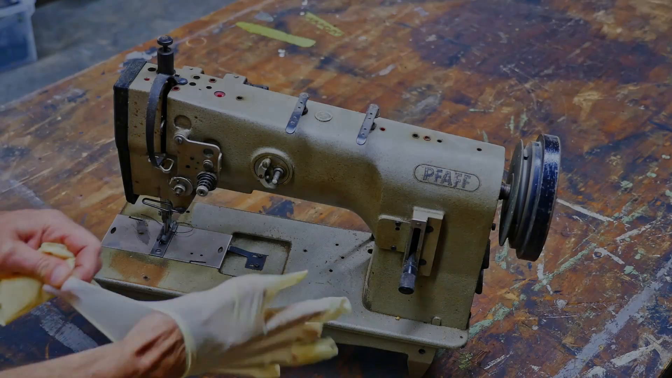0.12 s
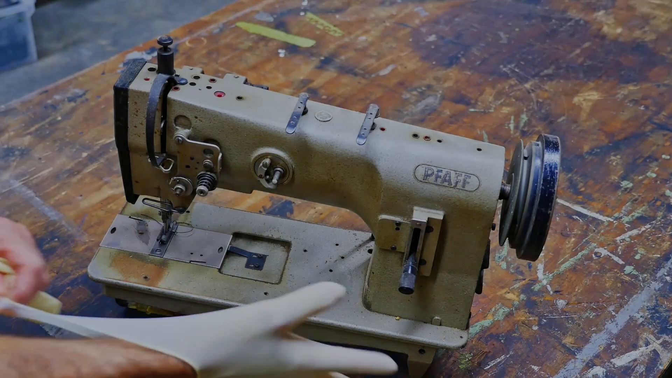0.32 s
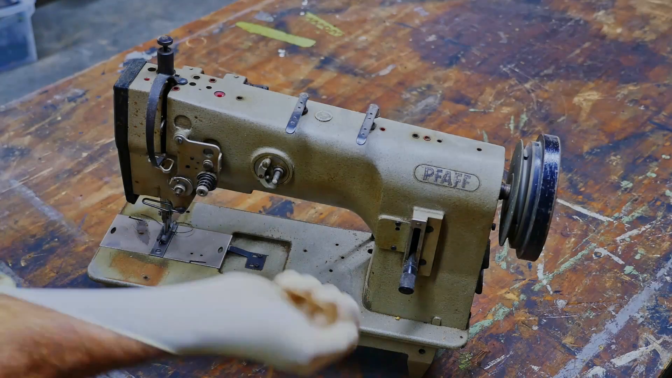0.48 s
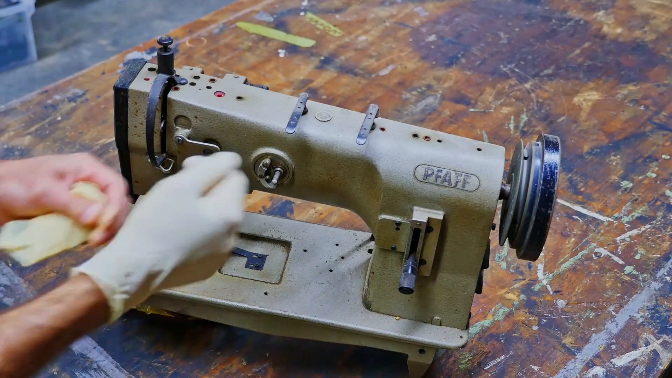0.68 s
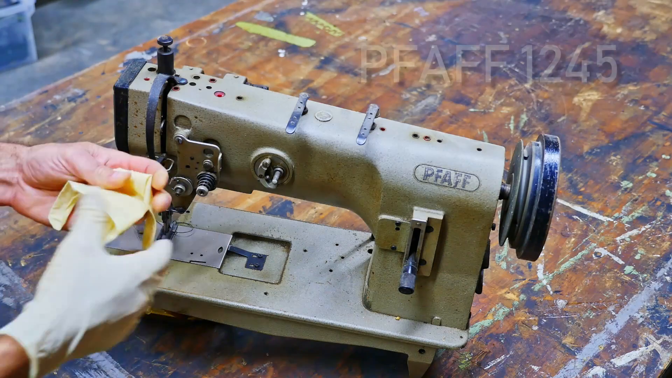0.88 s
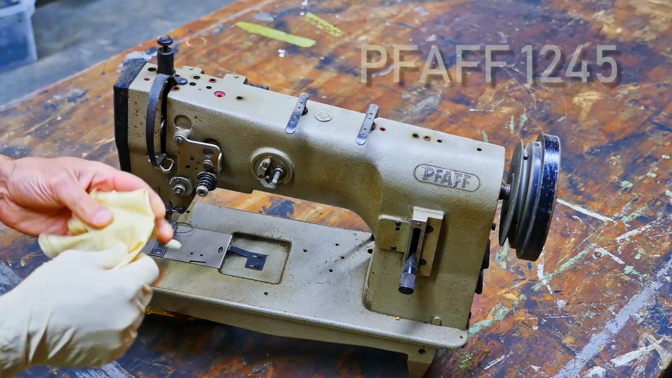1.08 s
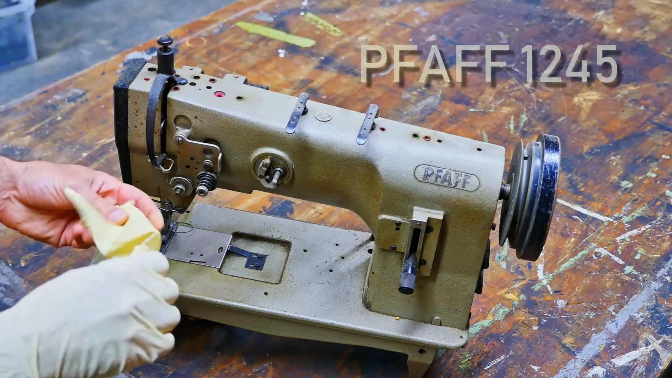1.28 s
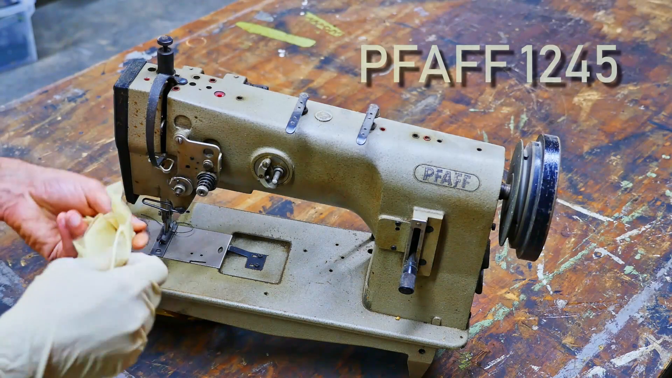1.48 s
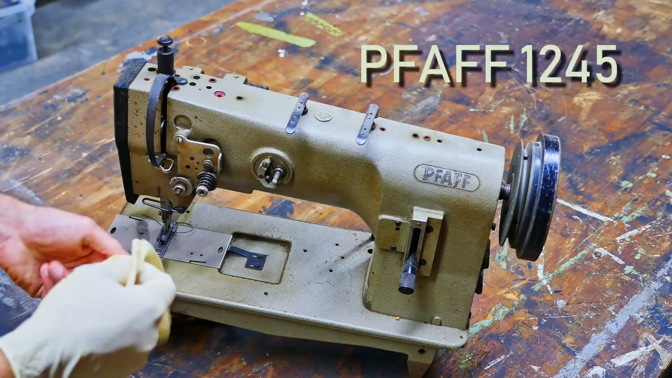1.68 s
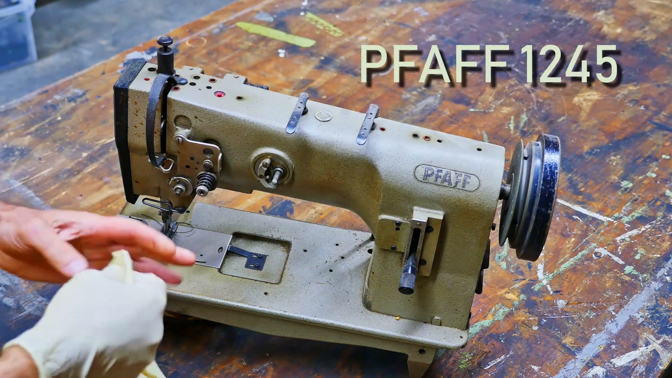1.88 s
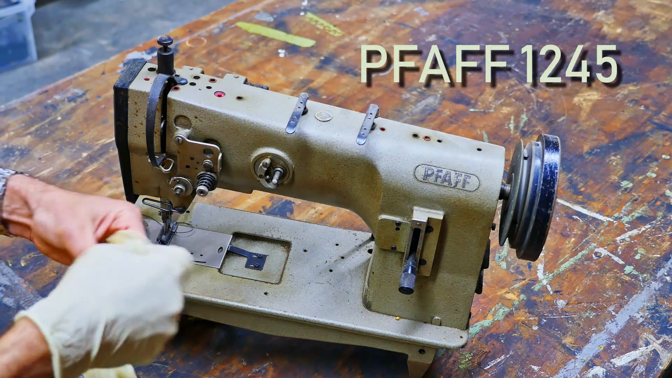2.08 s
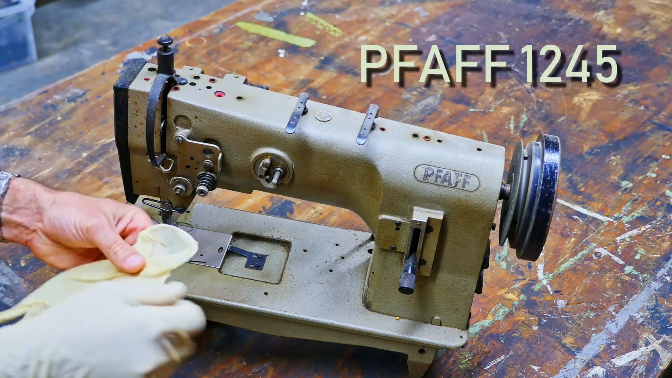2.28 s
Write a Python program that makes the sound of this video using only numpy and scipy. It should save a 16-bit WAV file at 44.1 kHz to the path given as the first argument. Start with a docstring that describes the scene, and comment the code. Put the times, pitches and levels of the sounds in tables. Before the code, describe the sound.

A rubber glove is pulled on, close and central: rubbing with dull fold pops and soft air puffs from 0 to 0.27 s, a tiny rising squeak at 0.3, stuttering cuff judder at 0.38-0.48, then bright snaps at 0.62 and 0.73. Afterwards a second glove rustles softly, with small pops near 1.25, 1.68 and 2.12 s, fading over faint hum in a small, lightly reverberant workshop.

```python
"""Rubber gloves in a quiet workshop

A rubber glove is pulled onto a hand above a bench: folds pop, the cuff squeaks, judders and snaps.
Then a second glove is rustled between the fingers over a faint electrical hum.
Filtered random grains make the friction, filtered clicks and noise bursts the events,
and a sum of harmonics the squeak; a diffuse room tail and a small microphone complete it."""
import sys
import numpy as np
from scipy import signal
from scipy.fft import rfft, irfft
from scipy.io import wavfile

SR = 44100
rng = np.random.default_rng(int(sys.argv[2]) if len(sys.argv) > 2 else 0)


def inscribe(sig):
    """Save sig as 16-bit PCM at rate SR to the path in sys.argv[1].

    A 1-D sig is mono; a 2-D sig holds one channel per row.
    Samples are clipped to [-1, 1] before scaling.
    """
    pcm = np.round(np.clip(np.atleast_2d(sig).T, -1, 1) * 32767)
    wavfile.write(sys.argv[1], SR, pcm.astype(np.int16))


N = 101430
T = np.arange(N) / SR

# hum tones: f/Hz, level/dB
HUM_TONES = [(120, -71), (240.5, -66.5), (296.8, -62.5), (595, -75)]
# room noise spectrum: f/Hz, density/dB per Hz
AIR_SPECTRUM = [(25, -108), (45, -101), (62, -93), (120, -89), (215, -84), (360, -85.5), (500, -89.5),
                (1000, -94), (2000, -96.5), (3600, -100), (5500, -104), (9000, -103), (14000, -103)]
# diffuse sound, side against mid: f/Hz, gain/dB
DIFFUSE_WIDTH = [(60, 0.5), (600, 1.5), (1100, 1), (2400, -4.5), (4000, -4.5), (5500, -10), (7500, -6.5),
                 (10000, -5.5), (13000, 5)]
# near sound, stereo spread: f/Hz, side gain/dB
DIRECT_WIDTH = [(100, -16), (1000, -18.5), (3500, -12), (5500, -17.5), (7500, -9), (10000, -1), (13000, -3)]
# left minus right: f/Hz, difference/dB
BALANCE = [(100, -0.7), (500, -1), (1500, 1.8), (5000, 0), (8000, -0.3), (13000, -3.5)]
# microphone response: f/Hz, gain/dB
MICROPHONE = [(30, -3.5), (4300, 2), (4900, 4.5), (5500, 7), (6400, 1), (7400, 2), (8200, -3.5),
              (10000, -5), (11500, -13), (15000, -22.5)]
# rubber rubbing on rubber and skin: t/s, level/dB
RUB_LEVEL = [(0, -44.5), (0.2, -43.5), (0.262, -34.5), (0.3, -39.5), (0.37, -38.5), (0.48, -40.5),
             (0.565, -35.5), (0.6, -44.5), (0.68, -38), (0.78, -48), (0.9, -53.5), (0.93, -49.5),
             (0.985, -55.5), (1.03, -46), (1.082, -42.5), (1.11, -48), (1.2, -47), (1.28, -48.5),
             (1.365, -45.5), (1.45, -51), (1.53, -48.5), (1.65, -54), (1.73, -51.5), (1.81, -64),
             (1.95, -58.5), (2.04, -60), (2.085, -52.5), (2.14, -46.5), (2.19, -54.5), (2.3, -60.5)]
# friction hiss filter: f/Hz, gain/dB
RUB_COLOUR = [(40, -17), (140, 5), (350, -4.5), (900, -6.5), (2200, -1.5), (3700, -6), (5400, 2), (7200, 1),
              (10000, 0), (14000, -5)]
# lower rustle of the stretched sheet: f/Hz, gain/dB
PULL_COLOUR = [(40, -31), (130, -4), (240, 6), (650, 2), (1400, -2.5), (2300, 1.5), (4000, -5.5),
               (12000, -20)]
# trapped air leaving the glove: t/s, level/dB, decay/s, f/Hz
PUFFS = [(0.059, -38, 0.0035, 380), (0.114, -40, 0.02, 260), (0.217, -34.5, 0.022, 292),
         (0.551, -41.5, 0.0061, 402), (0.622, -45, .018, 174), (0.7111, -32, 0.0021, 330),
         (0.7201, -31.5, 0.0036, 297)]
# folds popping over: t/s, level/dB, decay/s, centre f/Hz, width/octaves
FOLDS = [(0.0233, -21.5, 0.01, 1150, 1.5), (0.097, -29, 0.0031, 1190, 2.4),
         (0.1134, -23, 0.0068, 1430, 1.43), (0.1285, -21, 0.0042, 1550, 1.26),
         (0.2605, -23.5, 0.0097, 1720, 1.7), (0.2680, -20, 0.0044, 2200, 0.94),
         (0.551, -24.5, .012, 674, 2.1), (0.6234, -14.5, 0.0051, 2080, 0.54),
         (0.687, -20.5, 0.012, 1710, 0.43), (1.2095, -37, .003, 2200, .6),
         (1.2240, -34.5, 0.0059, 2180, 0.54), (1.243, -39, 0.0043, 2200, .7),
         (1.2714, -30.5, 0.005, 1840, 0.55), (1.6764, -27.5, 0.0054, 2150, 0.63),
         (2.1105, -38.5, 0.022, 1580, 1.9)]
# cuff squeak: t/s, f/Hz, level/dB
SQUEAK = [(0.294, 1504, -73), (0.303, 1539, -49), (0.311, 1580, -51), (0.32, 1586, -30.5),
          (0.326, 1568, -29), (0.330, 1680, -35), (0.337, 1890, -37), (0.345, 2030, -60)]
# squeak harmonics 1-5 at full strength: level/dB
SQUEAK_HARMONICS = [-12, -2, -13, -3.5, -17]
# taut rubber slapping skin: t/s, level/dB, rise/s, decay/s, lower f/Hz, upper f/Hz, relative ring/dB
SNAPS = [(0.2164, -29, 0.00029, 0.015, 380, 14000, -21), (0.3591, -23.5, 0.0018, 0.0041, 1200, 6500, -34),
         (0.6206, -20.5, 0.00035, 0.005, 158, 13300, -30),
         (0.627, -18.5, 0.00044, 0.0096, 3580, 12100, 0.5), (0.723, -28.5, 0.0044, 0.018, 1610, 9200, -24),
         (0.7307, -15.5, 0.00034, 0.0016, 2280, 5650, -28), (1.4105, -45, .001, .008, 3500, 8000, -12),
         (2.1323, -42.5, 0.0017, 0.018, 1480, 7500, 2)]
# reflections off the bench: delay/s, gain/1
BENCH_ECHOES = [(.0031, 0.5)]
# cuff sticking and slipping on skin: t/s, release/dB, rasp/dB, release f/Hz, rasp upper f/Hz
SLIPS = [(0.3833, 7, -32, 5000, 8000), (0.3898, -5, -27, 5500, 10000), (0.4024, 7, -23, 5300, 11000),
         (0.4112, -5, -26, 5800, 11000), (0.4185, 8, -22, 5400, 11000), (0.4295, -1, -22, 5400, 10000),
         (0.4410, -3, -26, 5000, 8000), (0.4553, 5, -26, 2200, 9000), (0.4698, 4, -25, 2200, 9000)]
# slip filter: f/Hz, gain/dB
SLIP_COLOUR = [(40, -16.5), (140, -41), (300, 1), (600, -7.5), (1200, 2), (2300, 1.5), (3600, -1.5),
               (5200, 2), (9000, 1), (14000, -16)]
# reflections off the metal bed and the bench: delay/s, gain/1
SLIP_ECHOES = [(.00155, 0.79), (.0032, .8)]

ROOM_DB, ROOM_ONSET_S, ROOM_SPLIT_HZ = -10.5, 0.0031, 5600
ROOM_T60_S, ROOM_TREBLE_T60_S = 0.48, 0.3
SPREAD_RISE_S, SPREAD_DECAY_S = 0.00011, 0.001
CUTOFF_HZ = 15500
GRAINS_PER_S, GRAIN_SPREAD_DB, RUB_FLUTTER_DB = 5400, 1, 1.1
TICKS_PER_S, TICK_DB, TICK_SPREAD_DB = 120, 13, 2
PULL_END_S, PULL_RELEASE_S, PULL_DB = 0.66, 0.14, -39.5
PUFF_RISE_S, PUFF_OCTAVES = 0.0015, 0.69
FOLD_RISE_S = 0.0012
SQUEAK_THINS_DB, SQUEAK_RELEASE_S = 12, 0.008
SQUEAK_TILT_DB_PER_DB, SQUEAK_JITTER = 0.23, 0.0077  # tilt per harmonic; jitter as a fraction of pitch
SNAP_RING_HZ, SNAP_RING_DECAY_S, SNAP_RING_WANDER_RAD = 5530, 0.0025, 0.2
RASP_RISE_S, RASP_DECAY_S = 0.0035, 0.016
RELEASE_OCTAVES, RELEASE_CLICK_DB = 0.26, -8


def from_db(db):
    """Decibels to amplitude gain."""
    return 10 ** (np.asarray(db) / 20)


def convolve(x, response):
    """Filter by an impulse response."""
    return signal.fftconvolve(x, response)[:N]


def colour(x, points):
    """Minimum-phase filter through (f/Hz, gain/dB) points, by folding the cepstrum."""
    hz, db = np.transpose(points)
    size = 8192
    grid_hz = np.maximum(np.arange(size // 2 + 1) * SR / size, 1)
    gain = from_db(np.interp(np.log(grid_hz), np.log(hz), db))
    cepstrum = irfft(np.log(gain))
    cepstrum[1:size // 2] *= 2
    cepstrum[size // 2 + 1:] = 0
    return convolve(x, irfft(np.exp(rfft(cepstrum))))


def band(x, low_hz, high_hz):
    """Butterworth band-pass."""
    sos = signal.butter(2, [low_hz, high_hz], "band", fs=SR, output="sos")
    return signal.sosfilt(sos, x + 1e-18)  # offset avoids denormals


def around(x, hz, octaves):
    """Band-pass about a centre."""
    half = 2 ** (octaves / 2)
    return band(x, hz / half, hz * half)


def drift(points_per_s):
    """Random wander: straight lines between normal random points."""
    return np.interp(T * points_per_s, np.arange(N), rng.standard_normal(N))


def envelope(start_s, rise_s, decay_s):
    """Straight rise, exponential fall."""
    rise = np.clip((T - start_s) / rise_s, 0, 1)
    return rise * np.exp(-np.maximum(T - start_s - rise_s, 0) / decay_s)


def burst(start_s, rise_s, decay_s):
    """Random-sign noise under an envelope: a dying shower of tiny contacts."""
    return envelope(start_s, rise_s, decay_s) * rng.choice([-1., 1.], N)


def echoes(x, rows):
    """Adds delayed copies: reflections from close surfaces."""
    return x + sum(gain * np.interp(T - delay_s, T, x, left=0) for delay_s, gain in rows)


def background():
    """Room noise plus hum tones of slightly wavering phase."""
    hum = np.zeros(N)
    for hz, db in HUM_TONES:
        phase = 2 * np.pi * (hz * T + rng.random()) + 0.2 * drift(6)
        hum += from_db(db) * np.sqrt(2) * np.sin(phase)
    air = rng.standard_normal(N) * np.sqrt(SR / 2)  # unit power per Hz
    return hum + colour(air, AIR_SPECTRUM)


def room(x):
    """Diffuse tail of decaying noise; its treble dies sooner."""
    decay_s = ROOM_T60_S / np.log(1000)
    treble_decay_s = ROOM_TREBLE_T60_S / np.log(1000)
    low = band(rng.standard_normal(N), 60, ROOM_SPLIT_HZ)
    treble = band(rng.standard_normal(N), ROOM_SPLIT_HZ, CUTOFF_HZ)
    tail = low * envelope(0.005, ROOM_ONSET_S, decay_s)
    tail += treble * envelope(0.003, ROOM_ONSET_S, treble_decay_s)
    return from_db(ROOM_DB) * convolve(x, tail) / np.sqrt(SR * decay_s / 2)


def grains():
    """Dense tiny catches of random sign and uneven size, rms 1."""
    hits = (rng.random(N) < GRAINS_PER_S / SR) * rng.choice([-1, 1], N)
    x = hits * from_db(GRAIN_SPREAD_DB * np.minimum(rng.exponential(1, N), 5))
    return x / (x.std() + 1e-12)


def ticks():
    """Sparse, larger catches of rubber on rubber, echoed by the bench."""
    size_db = TICK_DB + TICK_SPREAD_DB * np.clip(rng.standard_normal(N), -2, 2)
    hits = (rng.random(N) < TICKS_PER_S / SR) * from_db(size_db)
    return echoes(band(hits, 510, 6200), BENCH_ECHOES)


def rubbing():
    """Fluttering friction hiss, with a lower rustle while the sheet is under tension."""
    hiss_db = np.interp(T, *np.transpose(RUB_LEVEL)) + RUB_FLUTTER_DB * drift(70)
    hiss = (grains() + ticks()) * from_db(hiss_db)
    tension = np.exp(-np.maximum(T - PULL_END_S, 0) / PULL_RELEASE_S)
    pull = grains() * from_db(PULL_DB + RUB_FLUTTER_DB * drift(48.6)) * tension
    return colour(hiss, RUB_COLOUR) + colour(pull, PULL_COLOUR)


def puffs():
    """Trapped air escapes: low, heavily damped thuds of flattened narrow-band noise."""
    out = np.zeros(N)
    for start_s, db, decay_s, hz in PUFFS:
        air = signal.hilbert(around(rng.standard_normal(N), hz, PUFF_OCTAVES))
        steady = np.cos(np.angle(air))  # phase only, constant amplitude
        thud = around(steady * envelope(start_s, PUFF_RISE_S, decay_s), hz, 2.4)
        out += from_db(db) * thud * np.sqrt(2)
    return out


def folds():
    """Folds pop over: dull noise bursts, each in its own band."""
    out = np.zeros(N)
    for start_s, db, decay_s, hz, octaves in FOLDS:
        out += from_db(db) * around(burst(start_s, FOLD_RISE_S, decay_s), hz, octaves)
    return out


def squeak():
    """Regular stick-slip: a rising tone, brighter as it swells; overtones fade as the grip lets go."""
    t_s, hz, db = np.transpose(SQUEAK)
    level_db, pitch_hz = np.interp(T, t_s, db), np.interp(T, t_s, hz)
    phase = 2 * np.pi * np.cumsum(pitch_hz * (1 + SQUEAK_JITTER * drift(600))) / SR
    thinning_db = -SQUEAK_THINS_DB * np.clip((T - t_s[db.argmax()]) / SQUEAK_RELEASE_S, 0, 1)
    below_peak_db = level_db - db.max()
    tone = np.zeros(N)
    for k, harmonic_db in enumerate(SQUEAK_HARMONICS):
        tilt_db = SQUEAK_TILT_DB_PER_DB * (k - 3) * below_peak_db
        part_db = level_db + harmonic_db + tilt_db + (k > 0) * thinning_db
        tone += from_db(part_db) * np.sin((k + 1) * phase)
    return np.sqrt(2) * tone * (T > t_s[0]) * (T < t_s[-1])


def snaps():
    """Taut rubber slaps skin: a broad crack with bench echo and a brief bright ring of the sheet."""
    out = np.zeros(N)
    for start_s, db, rise_s, decay_s, low_hz, high_hz, ring_db in SNAPS:
        phase = 2 * np.pi * SNAP_RING_HZ * (T - start_s) + SNAP_RING_WANDER_RAD * drift(810)
        ring = np.sin(phase) * envelope(start_s, rise_s, SNAP_RING_DECAY_S)
        crack = echoes(band(burst(start_s, rise_s, decay_s), low_hz, high_hz), BENCH_ECHOES)
        out += from_db(db) * (crack + from_db(ring_db) * ring)
    return out


def slips():
    """Cuff judder: each slip is a sharp, briefly pitched release and a short rasp."""
    rasps, releases = np.zeros(N), np.zeros(N)
    for start_s, release_db, rasp_db, hz, top_hz in SLIPS:
        click = from_db(release_db) * (np.arange(N) == int(start_s * SR))
        releases += around(click, hz, RELEASE_OCTAVES)
        releases += from_db(RELEASE_CLICK_DB) * band(click, 100, 3600)
        rasps += band(from_db(rasp_db) * burst(start_s, RASP_RISE_S, RASP_DECAY_S), 60, top_hz)
    return colour(rasps + echoes(releases, SLIP_ECHOES), SLIP_COLOUR)


def scene():
    """Mid/side stereo: glove close and central, with its treble spread wide and the room around it."""
    glove = rubbing() + puffs() + folds() + squeak() + snaps() + slips()
    spread = rng.standard_normal(N) * envelope(0, SPREAD_RISE_S, SPREAD_DECAY_S)
    glove_side = convolve(glove, spread / np.linalg.norm(spread))
    mid = glove + room(glove) + background()
    side = colour(room(glove) + background(), DIFFUSE_WIDTH) + colour(glove_side, DIRECT_WIDTH)
    channels = []
    for sign in (1, -1):  # left, right
        balance = [(hz, sign * db / 2) for hz, db in BALANCE]
        channels.append(colour(mid + sign * side, balance))
    return np.array(channels)


def record(dry):
    """Small microphone with a presence peak, then a steep low-pass."""
    heard = np.array([colour(channel, MICROPHONE) for channel in dry])
    low_pass = signal.ellip(10, 0.1, 80, CUTOFF_HZ, fs=SR, output="sos")
    return signal.sosfilt(low_pass, heard)


dry = scene()
out = record(dry)
inscribe(out)
```